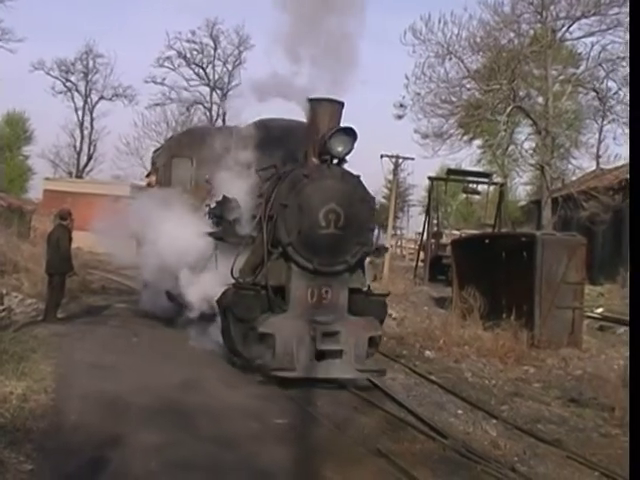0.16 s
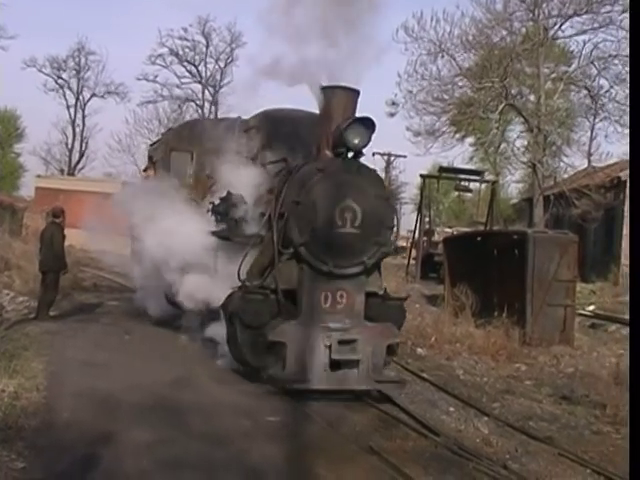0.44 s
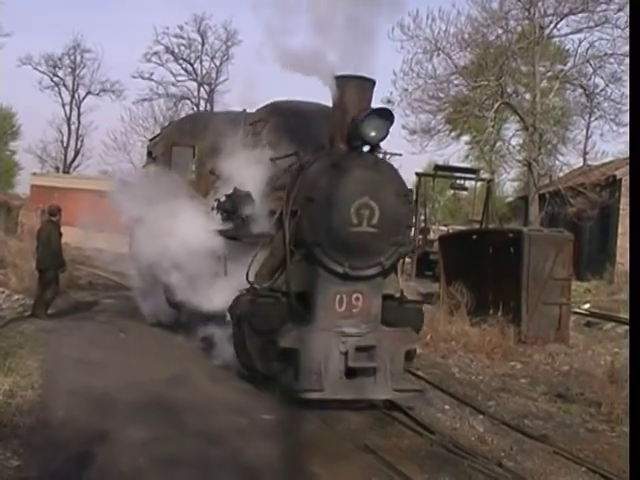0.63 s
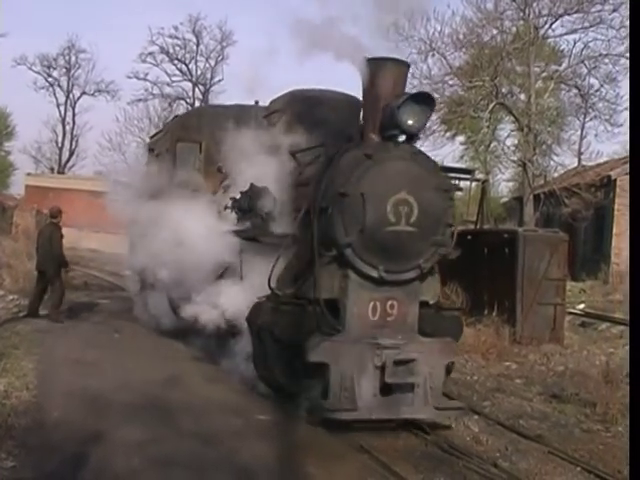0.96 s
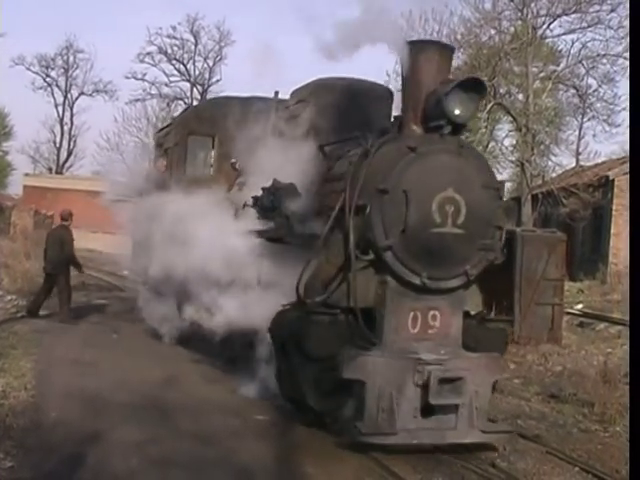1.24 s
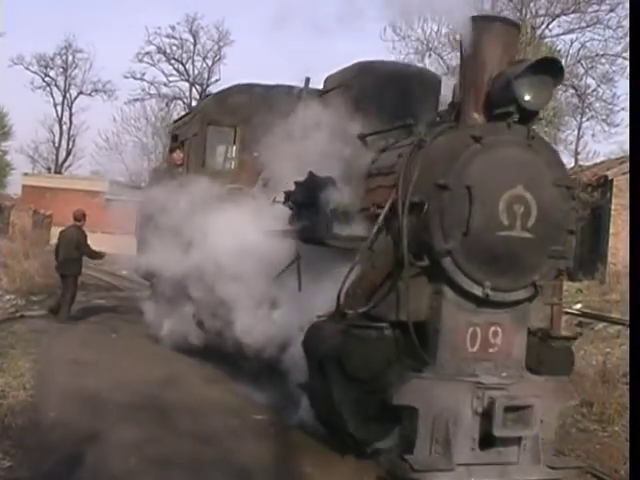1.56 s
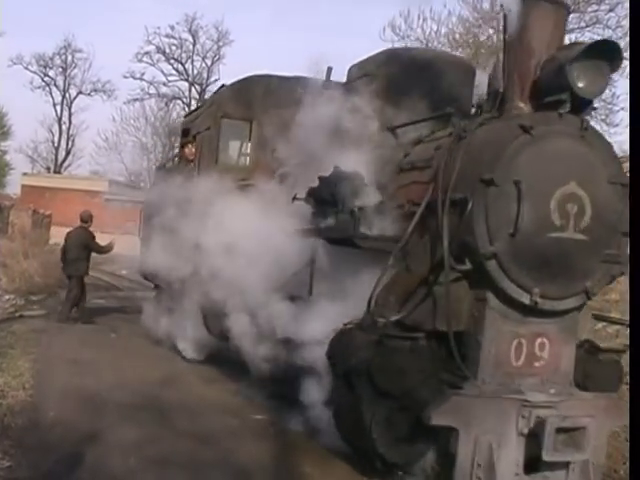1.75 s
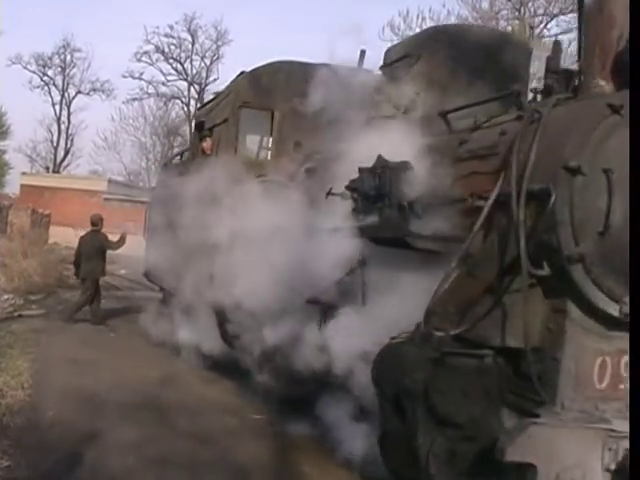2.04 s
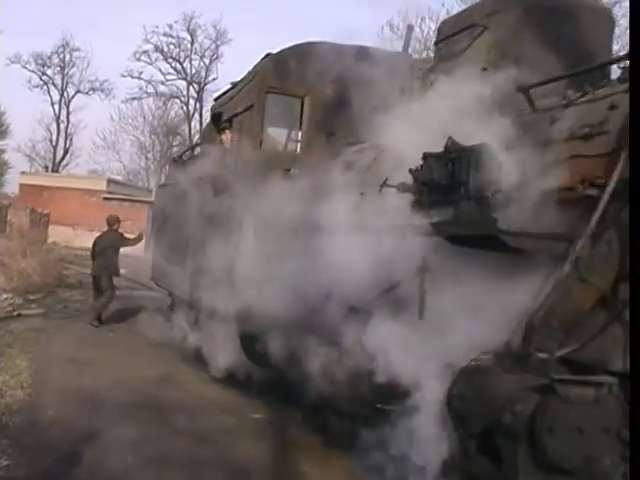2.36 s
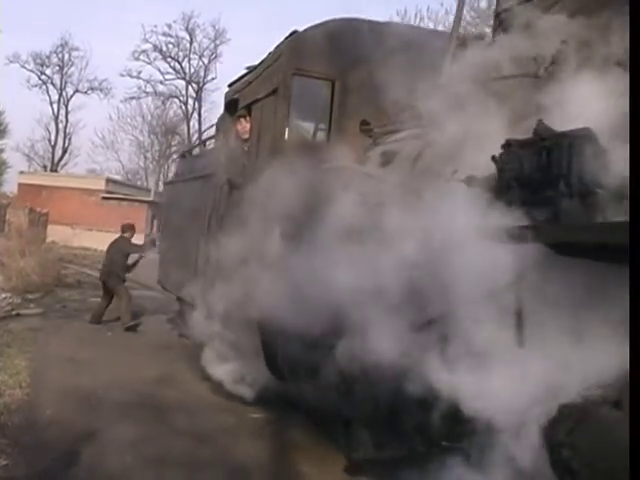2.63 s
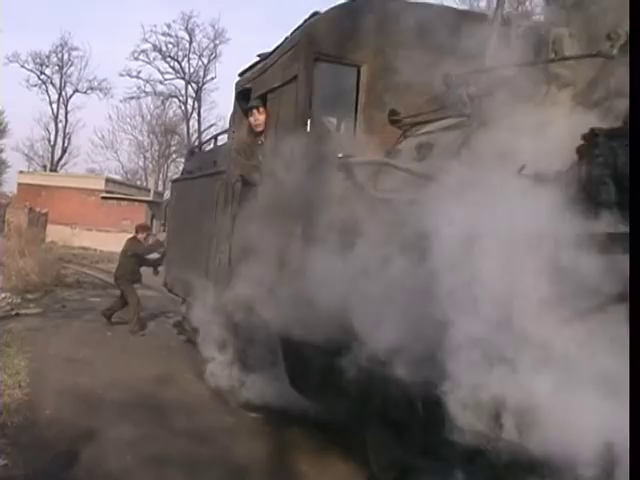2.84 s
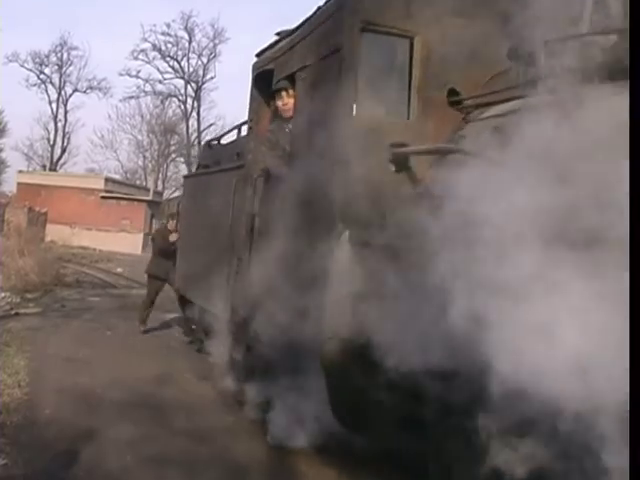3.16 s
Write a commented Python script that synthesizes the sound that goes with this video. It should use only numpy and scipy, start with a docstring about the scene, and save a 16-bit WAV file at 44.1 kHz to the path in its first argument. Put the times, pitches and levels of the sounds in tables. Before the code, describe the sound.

Steam engine chuffs by at close range, hollow rapid puffs, steady hiss, clattering rods

```python
"""In a yard, a small steam locomotive rolls slowly past, hissing steam from its cylinders.
Four exhaust beats per wheel turn, made of shaped noise, boom in the chimney: a tone that throbs at random.
The rods knock once a turn and loose gear clatters: bursts of noise and fading tones that drift to the right.
Steam is noise that flutters, sputters and spits. An automatic level control turns loud moments down,
most deeply at one hard clank near 2.9 s."""
import sys
import numpy as np
from scipy import signal
from scipy.fft import rfft, irfft
from scipy.io import wavfile
from scipy.ndimage import uniform_filter1d

SR = 44100
rng = np.random.default_rng(int(sys.argv[2]) if len(sys.argv) > 2 else 0)


def generate_wav(sig):
    """Save sig (samples, or channels by samples) to the path in sys.argv[1] as 16-bit PCM at SR."""
    pcm = np.round(np.clip(np.atleast_2d(sig).T, -1, 1) * 32767).astype(np.int16)
    wavfile.write(sys.argv[1], SR, pcm)


N = 145530
TIME = np.arange(N) / SR  # seconds

# puffs of exhaust: start t/s, time until the fade t/s, boom level/dB, bark level/dB, rasp level/dB
BEATS = [(0.13, 0.046, -40, -23.5, -36), (0.289, 0.061, -40, -26.5, -34), (0.5, 0.042, -25, -25.5, -35.5),
         (0.649, 0.051, -24, -30.5, -33), (0.845, 0.041, -22, -27, -36.5),
         (0.984, 0.062, -26.5, -29, -35.5), (1.196, 0.017, -25.5, -26.5, -34.5),
         (1.342, 0.072, -27, -33, -37), (1.524, 0.046, -25.5, -28, -37.5),
         (1.654, 0.066, -32.5, -26.5, -40), (1.883, 0.02, -23, -28, -33), (2.007, 0.037, -23.5, -27.5, -53),
         (2.176, 0.042, -27.5, -25.5, -32), (2.328, 0.059, -38, -29, -37.5), (2.523, 0.031, -23, -28, -33),
         (2.664, 0.039, -27, -28, -58), (2.838, 0.068, -35, -29, -41.5), (2.984, 0.037, -32, -26.5, -38),
         (3.163, 0.034, -40, -27, -39)]
BEAT_ATTACK_S, BEAT_DECAY_S = 0.0081, 0.02
# tone colour of the hollow bark: f/Hz, relative level/dB
BARK_COLOUR = [(40, -33), (100, -13.5), (160, -29), (240, 4.5), (320, 1.5), (400, -4.5), (495, 0),
               (600, -9.5), (750, -13), (1000, -17), (2000, -37), (6000, -37)]
# tone colour of the rasp: f/Hz, relative level/dB
RASP_COLOUR = [(200, -28), (600, 8), (1000, 5), (1230, -2.5), (1300, 3), (1380, -1), (2300, 0),
               (4000, -5.5), (8000, -12.5), (15000, -39)]
# pitch of the air column in the chimney: t/s, f/Hz
CHIMNEY_PITCH = [(0, 250), (.5, 236), (1, 223.9), (1.4, 212.4), (2, 213.3), (2.6, 216), (3.3, 219.2)]
CHIMNEY_WIDTH_HZ = 21.2  # higher = faster throbs
CHIMNEY_EVENNESS = 0.096  # 0 = throbs at random, 1 = steady strength
# draught that keeps the chimney sounding between beats: t/s, level/dB
DRAUGHT = [(0, -37), (.6, -35.5), (1.2, -32.5), (1.48, -32.5), (1.63, -33), (1.76, -25), (1.82, -33),
           (2.15, -31), (2.5, -32), (3.3, -40.5)]
# hard thumps in the chimney on the firmest beats: t/s, level/dB of the blow
THUMPS = [(.1515, -14), (.183, -32), (.5115, -15.5), (.5255, -8.5), (.8555, -18.5), (1.2065, -17),
          (1.2145, -12.5), (1.3495, -19), (1.8995, -15), (2.5445, -19), (2.6705, -18), (2.8375, -19),
          (2.857, -18)]
# tones that a thump sets ringing: f/Hz, relative level/dB, time to fade by 60 dB t/s
THUMP_MODES = [(246, -4, 0.11), (273, -1, 0.02), (375, -9, 0.018), (530, -5, 0.048)]
THUMP_LOW_CUT_HZ = 186

# hard metal blows of the rods and frame: t/s, peak short-time level/dB, damping time t/s,
# centre f/Hz, spread/octaves
CLANKS = [(0.6798, -22.5, .008, 2300, 0.55), (1.3675, -22.5, 0.0019, 2600, 1),
          (1.3728, -17, 0.0027, 1500, 1.4), (1.9473, -30.5, 0.0086, 2680, 1.2),
          (2.032, -16, 0.0017, 3550, 0.79), (2.0358, -13.5, 0.0043, 1870, 1.1),
          (2.0418, -19, 0.0078, 1390, 1.2), (2.6778, -14, 0.0041, 3220, 1.36),
          (2.6801, -13.5, 0.033, 1310, 0.77), (2.8943, -6, 0.0012, 1410, 0.93),
          (3.1674, -13.5, 0.0059, 795, 1.2), (3.1686, -19, 0.0029, 3000, 0.46),
          (3.2343, -21, 0.0069, 1680, 1), (3.246, -20.5, 0.0065, 2200, 1.3)]
# tones of the rods and frame: f/Hz, relative level/dB, time to fade by 60 dB t/s
CLANK_MODES = [(610, 3, 0.076), (740, -3, 0.067), (1070, -0.5, 0.11), (1097, -6, .06), (1297, 4.5, 0.094),
               (1470, -5.5, 0.093), (1758, -0.5, .08), (2086, -1, 0.06), (2350, 2, 0.067),
               (2800, 0.5, 0.15), (3160, -5, 0.018), (3510, -5.5, 0.02), (3920, 0, .05), (4540, 2.5, 0.029)]
CLANK_SCATTER_DB = 5  # chance spread of each tone from blow to blow
CLANK_TAIL_DB = -15.5  # share of each blow that rings on undamped

# knocks of rods and loose gear: t/s, level/dB, decay t/s, centre f/Hz
KNOCKS = [(0.68, -24, 0.024, 2200), (1.368, -24.5, 0.02, 2300), (1.505, -24.5, 0.009, 1810),
          (1.611, -26.5, 0.026, 870), (1.663, -26, 0.0061, 3460), (1.942, -24, 0.014, 2540),
          (2.031, -23, 0.029, 2180), (2.675, -21, 0.044, 1830), (2.776, -31, 0.012, 3600),
          (2.815, -31, 0.0096, 1690), (2.88, -30, 0.05, 1166), (3.011, -25, 0.0063, 1700),
          (3.121, -28, 0.019, 3020), (3.136, -24, 0.016, 2580), (3.176, -22.5, 0.01, 2710),
          (3.228, -23, 0.014, 1540), (3.245, -25.5, 0.01, 2020)]
KNOCK_ATTACK_S, RATTLE_DB = 0.0017, 4
KNOCK_WIDTH = 1.53  # band edges over and under the centre, as a ratio
# tone colour of the knocks: f/Hz, relative level/dB
KNOCK_COLOUR = [(100, -39), (350, 13), (650, 10), (1300, 6), (2000, 0.5), (3400, 3), (4500, 1),
                (6000, -4.5), (12000, -18)]
# tones of the iron that the knocks leave ringing: f/Hz, relative level/dB
IRON = [(1040, 5), (1300, 8.5), (1800, -7), (2040, 4), (2400, 6), (2850, -17), (3460, -4)]
IRON_T60_S = 0.11  # time to fade by 60 dB
IRON_DB = -9  # all the ringing, compared with the knocks

# strength of the steam jet: t/s, level/dB
STEAM = [(0, -33.5), (.38, -34.5), (.5, -31.5), (.75, -34), (1.08, -34), (1.19, -33.5), (1.45, -33.5),
         (1.62, -34.5), (1.76, -38.5), (1.89, -33.5), (2.1, -33.5), (2.52, -34), (2.88, -32), (2.97, -34.5),
         (3.3, -38.5)]
# tone colour of the jet: f/Hz, relative level/dB
STEAM_COLOUR = [(200, -1), (500, 4.5), (800, -2.5), (1200, -1), (1700, 0), (2400, -0.5), (3200, 0),
                (3700, -1), (5000, -1), (8000, -2.5), (12000, -5), (14500, -7)]
# strength of the breathy resonance at the nozzle: t/s, level/dB
NOZZLE = [(0, -44.5), (.55, -44), (.9, -49), (1.5, -51), (3.3, -58)]
NOZZLE_HZ, NOZZLE_WIDTH = 2730, 1.05  # centre; band edges as a ratio

# wet steam gushing from the drain cocks: t/s, level/dB
GUSH = [(0, -44.5), (.22, -42.5), (.45, -38), (.6, -40.5), (1, -41), (1.2, -36.5), (1.45, -53), (1.65, -34),
        (1.78, -43), (1.9, -33.5), (2.12, -49.5), (2.2, -30.5), (2.3, -42), (2.46, -32.5), (2.6, -41),
        (2.8, -38), (3, -34.5), (3.3, -38.5)]
# tone colour of wet steam: f/Hz, relative level/dB
GUSH_COLOUR = [(600, -4.5), (1000, 5), (1400, 0.5), (2200, 1.5), (3000, -3), (4500, -9)]
GUSH_PATCHY_DB, GUSH_FLICKER_HZ = 3, 21  # each narrow band by itself
SPUTTER_DB, SPUTTER_HZ = 0.5, 44.8  # all the bands together

# spurts of wet steam: t/s, time until the fade t/s, level/dB, centre f/Hz, width f/Hz
SPURTS = [(2.16, 0.014, -32.5, 1520, 600), (2.171, 0.084, -37, 1260, 129), (2.2, .025, -34.5, 2510, 205),
          (2.358, 0.023, -34.5, 1550, 686), (2.44, 0.037, -36, 1340, 1000),
          (2.614, 0.015, -31.5, 1680, 800), (2.728, 0.018, -28.5, 2000, 450),
          (2.745, .04, -37.5, 2520, 200), (2.809, 0.018, -37, 2220, 674), (2.811, 0.016, -30, 1343, 200)]
SPURT_ATTACK_S, SPURT_DECAY_S = 0.0034, 0.007
SPURT_ROUGH_DB, SPURT_ROUGH_HZ = 2, 120

# tone colour of the low rumble: f/Hz, relative level/dB
RUMBLE_COLOUR = [(20, -36), (40, -16), (70, -0.5), (120, 1), (200, 4.5), (300, 4), (500, -2.5), (800, -19),
                 (2000, -41)]
RUMBLE_DB = -36

# how alike the left and right noises are: f/Hz, correlation (1 = the same)
LIKENESS = [(60, 0.96), (300, 0.98), (600, 0.96), (1000, 0.85), (2000, 0.87), (4000, 0.7), (8000, 0.74),
            (13000, 0.82)]
# lean of the low exhaust sounds and the rumble: t/s, left minus right level/dB
EXHAUST_PAN = [(0, 2), (1.8, 2.5), (2.6, 2.5), (3.3, 3)]
# lean of the rasp, steam and running gear: t/s, left minus right level/dB
GEAR_PAN = [(0, 0.8), (2, -0.6), (2.7, -3), (3.3, -6.5)]

# automatic level control
LIMIT_DB, RECOVER_DB_PER_S = -14.5, 15
LIMIT_ATTACK_S, LOOK_AHEAD_S = 0.00017, 0.00066
DETECTOR_TREBLE_HZ, DETECTOR_TREBLE_DB = 1000, 4  # treble counts for more
DETECTOR_S = 0.0013
CUTOFF_HZ = 14400  # top of the finished sound


def exhaust():
    """Each puff is a hollow bark with a rasp on top, and drives the chimney; the firmest also thump."""
    boom = bark = rasp = 0
    for start, length, boom_db, bark_db, rasp_db in BEATS:
        puff = burst(start, BEAT_ATTACK_S, length, BEAT_DECAY_S)
        boom = boom + from_db(boom_db) * puff
        bark = bark + from_db(bark_db) * puff
        rasp = rasp + from_db(rasp_db) * puff
    # draught and beats add as powers
    chimney_drive = np.hypot(from_db(in_time(DRAUGHT)), boom)
    low = chimney(chimney_drive) + bark * noise(BARK_COLOUR) + thumps()
    rasp_flicker = rms_one(from_db(3.0 * drift(66)))
    rasp_sound = rasp * rasp_flicker * noise(RASP_COLOUR)
    return pan(low, EXHAUST_PAN) + pan(rasp_sound, GEAR_PAN)


def chimney(drive):
    """The air column booms in uneven throbs, wandering in pitch."""
    # two chance signals as one complex number move both strength and phase
    sway = drift(CHIMNEY_WIDTH_HZ) + 1j * drift(CHIMNEY_WIDTH_HZ)
    sway = sway / (abs(sway) + 1e-6) ** CHIMNEY_EVENNESS
    turns = np.cumsum(in_time(CHIMNEY_PITCH)) / SR
    tone = np.real(sway * np.exp(2j * np.pi * turns))
    return drive * rms_one(tone)


def thumps():
    """Sharp blows set a few low tones ringing; the deepest bass is cut."""
    return high_pass(strike(THUMPS, THUMP_MODES), THUMP_LOW_CUT_HZ, order=2)


def clanks():
    """Each blow rings the tones near its centre with uneven strengths; the closed joint damps them."""
    hz, mode_db, t60 = np.transpose(CLANK_MODES)[:, :, None]
    age = np.arange(SR // 8) / SR
    out = np.zeros((2, N + SR))
    rings = from_db(mode_db - 60 * age / t60) * np.sin(2 * np.pi * hz * age)
    for s, db, damping_s, centre_hz, octaves in CLANKS:
        distance = np.log2(hz[:, 0] / centre_hz) / octaves
        force = rng.choice([-1, 1], len(hz)) * np.exp(-0.5 * distance ** 2)
        # left and right get their own uneven strengths
        scatter = from_db(CLANK_SCATTER_DB * rng.standard_normal((2, len(hz))))
        blow = (force * scatter) @ rings
        blow = blow * (np.exp(-age / damping_s) + from_db(CLANK_TAIL_DB))
        crest = np.sqrt(short_power(blow).max())
        first = int(s * SR)
        out[:, first:first + len(age)] += from_db(db) * blow / crest
    return out[:, :N]


def knocks():
    """Slack joints take up in short rattling crashes that leave the iron ringing."""
    rattle = from_db(RATTLE_DB * drift(570)) * noise(KNOCK_COLOUR)
    crash = 0
    for s, db, decay, hz in KNOCKS:
        shape = burst(s, KNOCK_ATTACK_S, KNOCK_ATTACK_S, decay)
        crash = crash + from_db(db) * shape * rms_one(band(rattle, hz, KNOCK_WIDTH))
    iron = sum(from_db(db) * ring(crash, hz, IRON_T60_S) for hz, db in IRON)
    return crash + from_db(IRON_DB) * crash.std() * rms_one(iron)


def steam():
    """A smooth, bright jet that flutters slightly, with a breathy resonance at the nozzle."""
    jet = from_db(in_time(STEAM)) * noise(STEAM_COLOUR)
    breath = rms_one(band(noise(STEAM_COLOUR), NOZZLE_HZ, NOZZLE_WIDTH))
    nozzle = from_db(in_time(NOZZLE)) * breath
    flutter = from_db(1.05 * drift(23.0))
    return (jet + nozzle) * flutter


def gush(count=12):
    """Wet steam sputters, while narrow bands in it swell and fade, each on its own."""
    source = noise(GUSH_COLOUR)
    centres = np.geomspace(700, 4200, count)
    ratio = np.sqrt(centres[1] / centres[0])  # neighbouring bands just meet
    bands = 0
    for hz in centres:
        flicker = from_db(GUSH_PATCHY_DB * drift(GUSH_FLICKER_HZ))
        bands = bands + band(source, hz, ratio, order=2) * flicker
    sputter = from_db(SPUTTER_DB * drift(SPUTTER_HZ))
    return from_db(in_time(GUSH)) * rms_one(bands * sputter)


def spurts():
    """Slugs of water in the steam spit briefly, each around a pitch of its own."""
    source = noise(GUSH_COLOUR)
    rough = rms_one(from_db(SPURT_ROUGH_DB * drift(SPURT_ROUGH_HZ)))
    spits = 0
    for s, length, db, hz, width_hz in SPURTS:
        shape = burst(s, SPURT_ATTACK_S, length, SPURT_DECAY_S)
        pitched = rms_one(band(source, hz, 1 + width_hz / hz / 2, order=2))
        spits = spits + from_db(db) * shape * pitched
    return rough * spits


def rumble():
    """A steady low rumble: noise that is strongest in the bass."""
    return from_db(RUMBLE_DB) * noise(RUMBLE_COLOUR)


def from_db(db):
    """Turn decibels into a multiplier."""
    return 10 ** (np.asarray(db) / 20)


def rms_one(x):
    """Scale to an average power of 1."""
    return x / np.sqrt(np.mean(x ** 2) + 1e-20)


def in_time(rows):
    """Join (t/s, value) points by straight lines."""
    return np.interp(TIME, *np.transpose(rows))


def at_hz(points, hz):
    """Read (f/Hz, value) points along a logarithmic pitch scale."""
    f, value = np.transpose(points)
    return np.interp(np.log(hz + 1), np.log(f), value)


def drift(rate_hz):
    """A random wander with spread 1; a higher rate wanders faster."""
    hz = np.fft.rfftfreq(N, 1 / SR)
    spectrum = rfft(rng.standard_normal(N)) / (1 + (hz / rate_hz) ** 2)
    return rms_one(irfft(spectrum, N))


def noise(colour):
    """Stereo noise of a given colour, as alike left and right as LIKENESS says at each pitch."""
    hz = np.fft.rfftfreq(N, 1 / SR)
    mid, side = rfft(rng.standard_normal((2, N))) * from_db(at_hz(colour, hz))
    alike = np.clip(at_hz(LIKENESS, hz), 0, 1)
    # the side part enters with opposite signs left and right
    both = np.sqrt(1 + alike) * mid + np.sqrt(1 - alike) * side * [[1], [-1]]
    return rms_one(irfft(both, N))


def burst(start, attack, hold, decay):
    """Straight rise, full strength until hold seconds after the start, then a natural fade."""
    age = TIME - start
    return np.clip(age / attack, 0, 1) * np.exp(-np.maximum(age - hold, 0) / decay)


def ring(x, hz, t60):
    """One fading tone set off by x; a click of height 1 rings with height 1."""
    r = from_db(-60 / (t60 * SR))
    w = 2 * np.pi * hz / SR
    return signal.lfilter([0, np.sin(w)], [1, -2 * r * np.cos(w), r * r], x + 1e-18)


def strike(rows, modes):
    """Blows (t/s, level/dB) on a body with tones (f/Hz, level/dB, 60 dB fade t/s)."""
    blows = np.zeros(N)
    for s, db in rows:
        blows[int(s * SR)] = from_db(db)
    total = 0
    for k, (hz, db, t60) in enumerate(modes):
        sign = (-1) ** (k // 2)
        total = total + sign * from_db(db) * ring(blows, hz, t60)
    return total


def band(x, hz, ratio, order=1):
    """Keep the pitches from hz / ratio to hz * ratio."""
    ratio = max(ratio, 1.01)
    edges = [hz / ratio, min(hz * ratio, SR / 2 - 1)]
    return signal.sosfilt(signal.butter(order, edges, "band", fs=SR, output="sos"), x)


def high_pass(x, hz, order):
    """Weaken everything below hz."""
    return signal.sosfilt(signal.butter(order, hz, "high", fs=SR, output="sos"), x)


def pan(x, rows):
    """Lean left or right over time."""
    return x * from_db(in_time(rows) * [[0.5], [-0.5]])


def short_power(x):
    """Average power of both channels over about a millisecond."""
    samples = max(int(DETECTOR_S * SR), 1)
    return abs(uniform_filter1d(np.mean(x ** 2, axis=0), samples, mode="constant"))


def scene():
    """Low exhaust and rumble share one lean; rasp, steam and running gear drift to the right."""
    gear = clanks() + knocks() + steam() + gush() + spurts()
    return exhaust() + pan(gear, GEAR_PAN) + pan(rumble(), EXHAUST_PAN)


def record(dry):
    """Level control ducks at once on loud moments, bright ones most, and recovers slowly; the top is cut."""
    treble = high_pass(dry, DETECTOR_TREBLE_HZ, order=1)
    power = short_power(dry + (from_db(DETECTOR_TREBLE_DB) - 1) * treble)
    over_db = np.maximum(10 * np.log10(power + 1e-12) - LIMIT_DB, 0)
    # hold each peak, then let go along a straight line in dB
    recovery = RECOVER_DB_PER_S * TIME
    held_db = np.maximum.accumulate(over_db + recovery) - recovery
    r = np.exp(-1 / (LIMIT_ATTACK_S * SR))
    smooth_db = signal.lfilter([1 - r], [1, -r], held_db)
    # ducking starts a little early
    duck_db = np.interp(TIME + LOOK_AHEAD_S, TIME, smooth_db)
    clipped = np.clip(dry * from_db(-duck_db), -0.36, 0.36)  # flattens the highest peaks
    return signal.sosfilt(signal.ellip(10, 0.1, 80, CUTOFF_HZ, fs=SR, output="sos"), clipped)


dry = scene()
out = record(dry)
generate_wav(out)
```